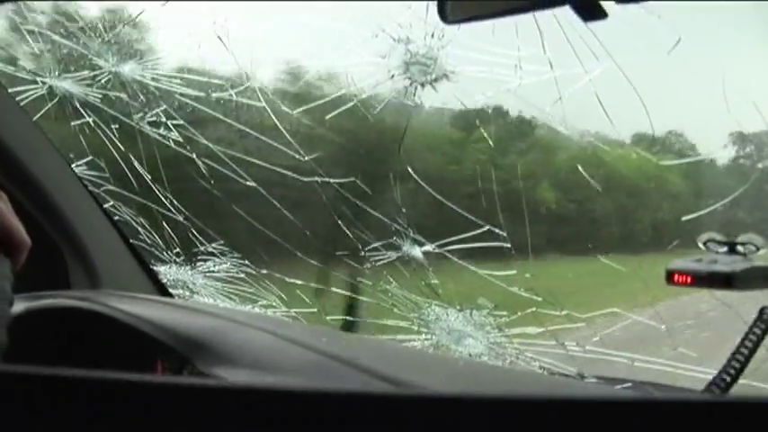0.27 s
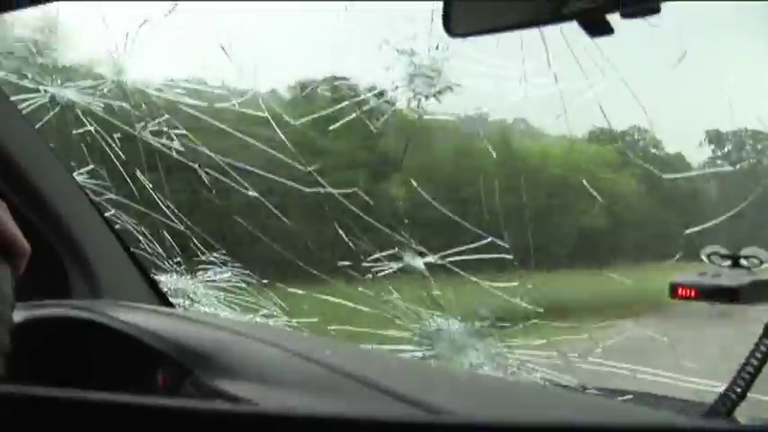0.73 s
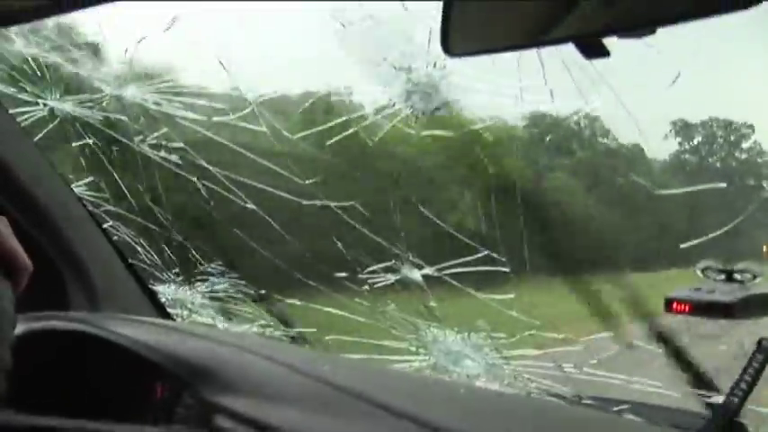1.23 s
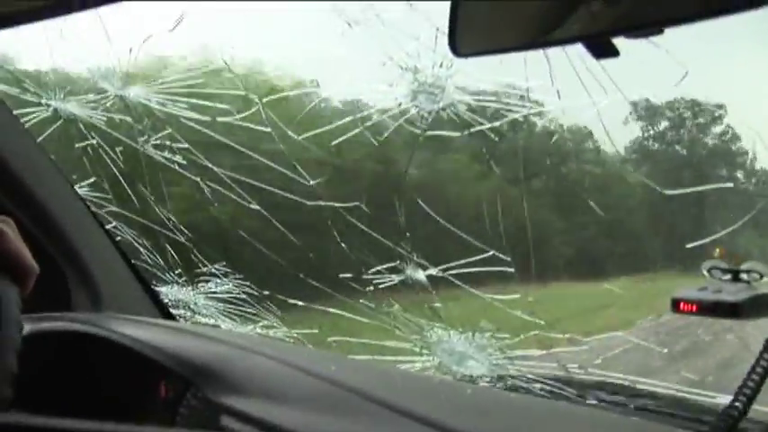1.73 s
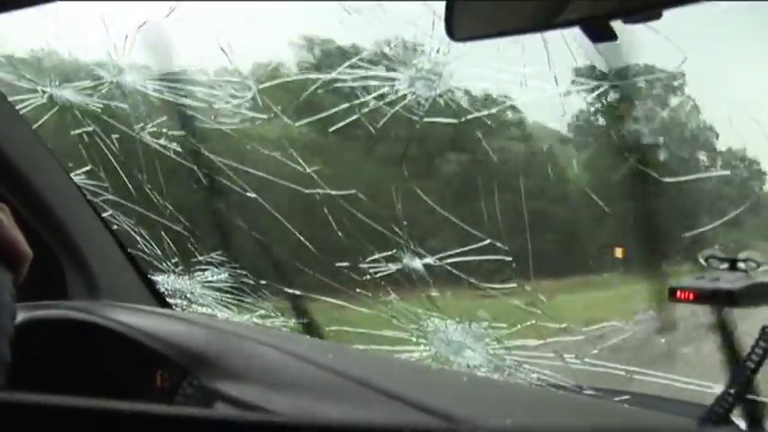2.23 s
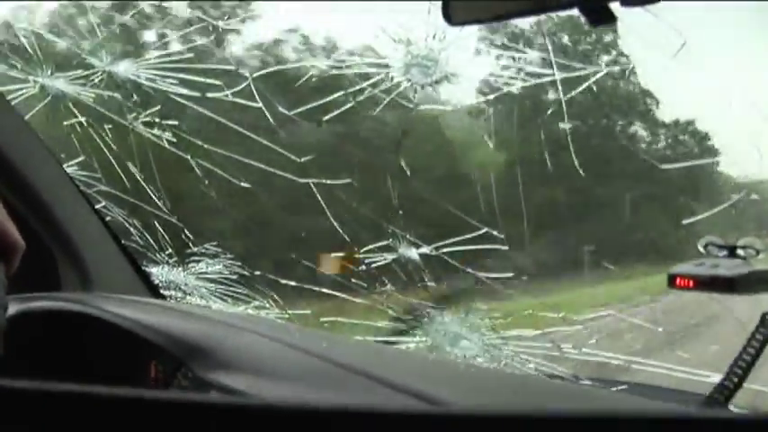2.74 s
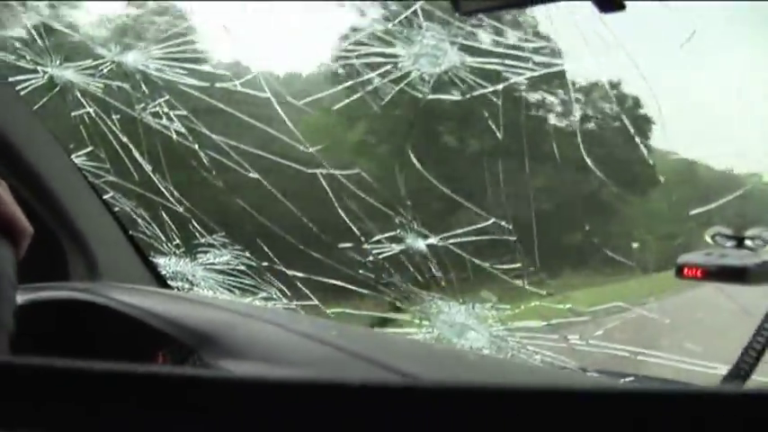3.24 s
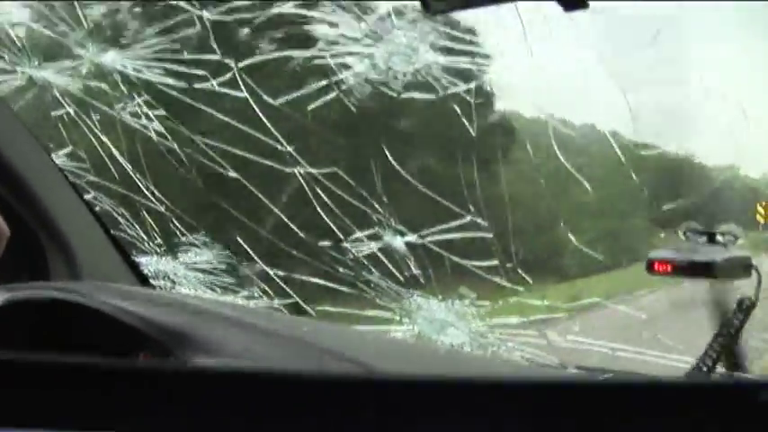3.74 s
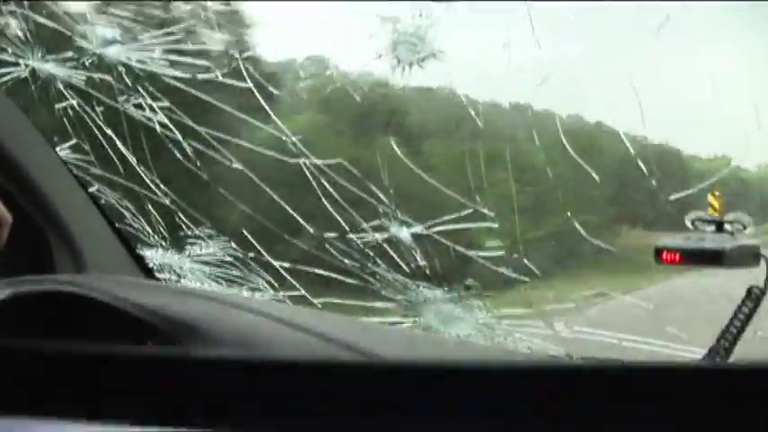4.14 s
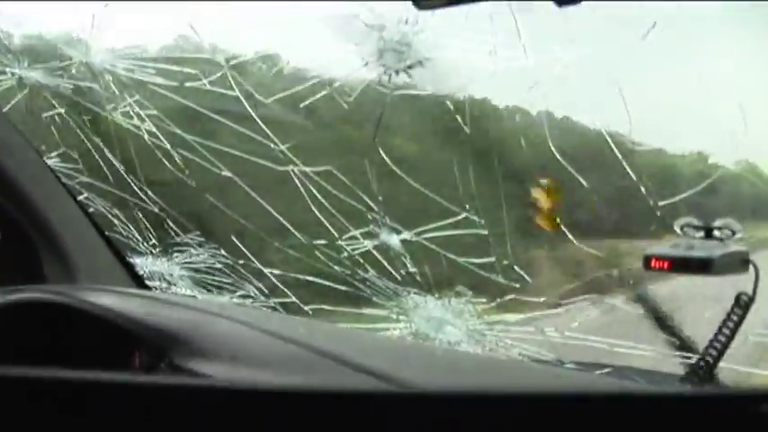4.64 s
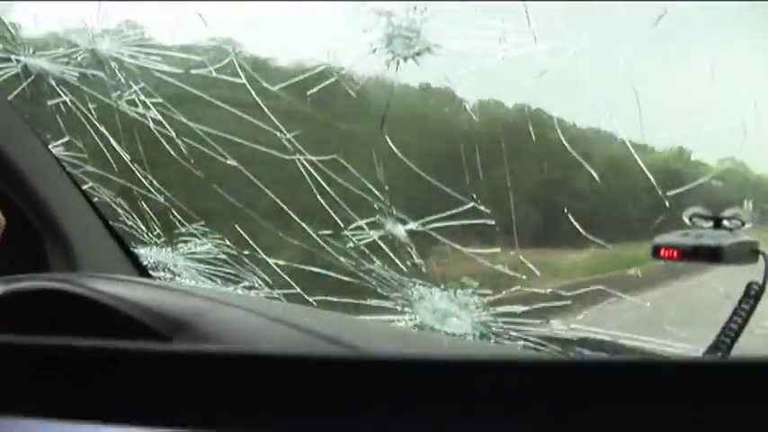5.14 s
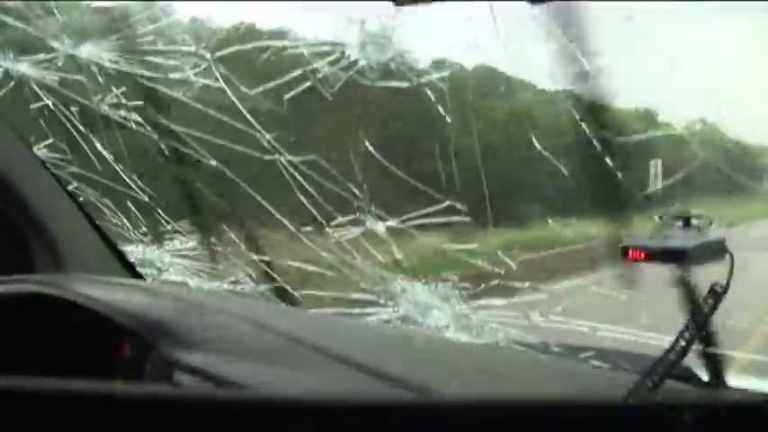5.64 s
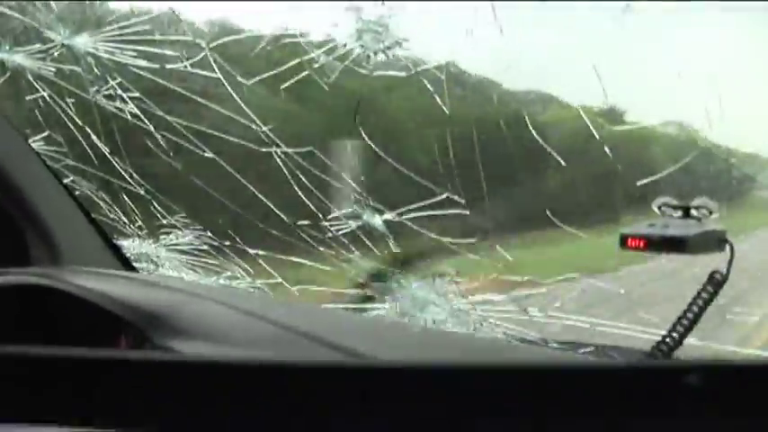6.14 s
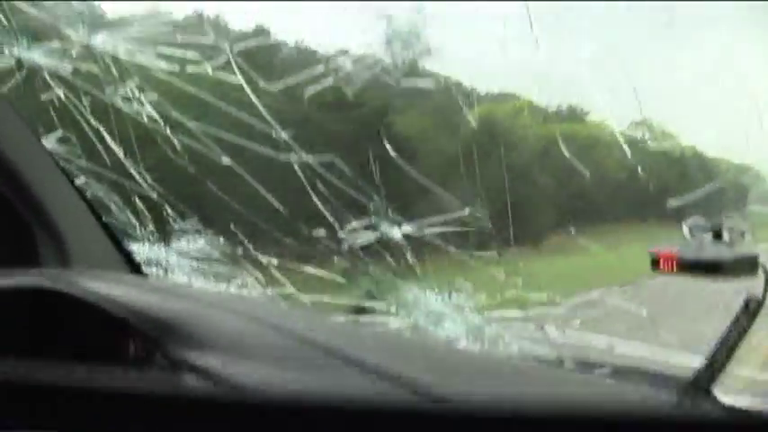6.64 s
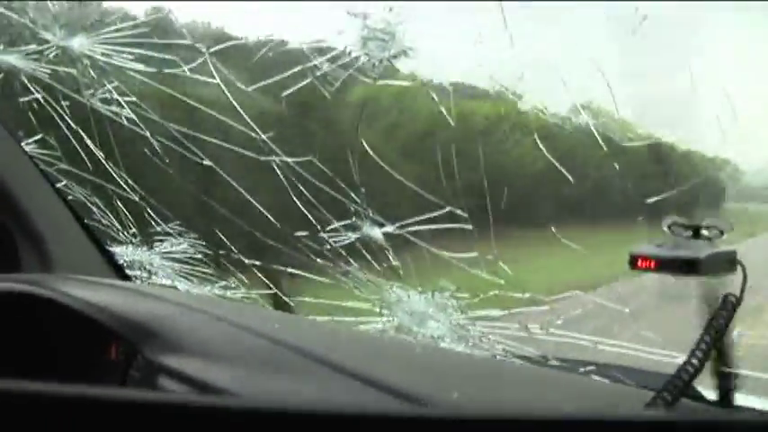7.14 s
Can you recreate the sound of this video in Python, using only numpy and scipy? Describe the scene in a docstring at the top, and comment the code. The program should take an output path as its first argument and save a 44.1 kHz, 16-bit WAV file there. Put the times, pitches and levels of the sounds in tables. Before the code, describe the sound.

Inside a car driving through a hailstorm, a steady low rumble of wind and tyres wavers slightly beneath a thin hiss of spray, with barely audible wiper swishes. A bassy bang on metal opens at 0 s, then a lighter one at 0.6 and a sharp windshield crack with a deep thud at 0.8. Loud hollow booms on the bodywork follow at 1.4, 1.8 and 2.1, and a glass crack at 2.3. From 2.8 to 4.4 it is sparser: small knocks, ticks and a few dull thuds. A hard crack on glass lands at 4.5, then heavy metal booms at 4.75, 5.05 and 5.2. Lighter taps lead to a bang at 6.4, and a dense volley of cracks and booms from 6.7 to 7.3, ending abruptly while still ringing. The ringing dies within about half a second; the biggest blows overload the microphone.

```python
"""Driving through a hailstorm

We sit inside a car: shaped noise makes the rumble of wind and tyres, the hiss of spray and the wipers.
Big stones boom on the roof and bonnet or crack on the broken windshield, loud enough to overload the microphone.
Smaller ones knock and tick in between. Each stone sets off many crowded resonances that die away,
the high ones mostly first; low sine waves make dull thuds in the bodywork."""
import sys
import numpy as np
from scipy import signal
from scipy.fft import irfft, next_fast_len
from scipy.io import wavfile

SR = 44100
rng = np.random.default_rng(int(sys.argv[2]) if len(sys.argv) > 2 else 0)


def put_to_file(sound):
    """Save the sound as 16-bit audio at rate SR, in the file named by the first command-line argument."""
    columns = np.atleast_2d(sound).T  # one column per channel
    safe = np.clip(columns, -1, 1)
    whole_steps = np.round(safe * 32767)
    wavfile.write(sys.argv[1], SR, whole_steps.astype(np.int16))


N = 325792  # length in samples

# colour of wind and tyre rumble, and of spray: f/Hz, relative level per Hz/dB
ROAD_COLOUR = [(12, -43), (20, -8), (86, -3), (138, -7), (168, -16), (243, -9.5), (274, -18), (309, -20),
               (343, -30.5), (398, -23), (428, -33.5), (490, -29), (700, -40), (910, -50), (1540, -120)]
SPRAY_COLOUR = [(410, -1), (700, -2.5), (968, 0.5), (1360, -5.5), (1800, -7.5), (2110, -7.5), (4950, -16.5),
                (7120, -39), (11800, -24), (14300, -33), (15500, -41)]
# wind on the body, added to ROAD_DB: t/s, level change/dB
WIND_BUFFETS = [(0, 5.5), (.4, 2), (2.2, -.7), (4.2, 0.7), (6.0, 0), (7.39, 3)]
ROAD_DB = -19.5
# water on the road and the glass: t/s, level/dB
SPRAY_LEVEL = [(0, -36), (1.2, -33.5), (2.6, -36.5), (4.1, -36), (5.5, -36), (6.0, -34.5), (7.39, -34.5)]
# wipers pushing water across the glass: t/s at the height of the stroke, length/s, level/dB
WIPER_STROKES = [(.503, 0.13, -45.5), (4.34, .14, -42), (5, 0.072, -41), (6.2, 0.64, -47)]
# colour of the pushed water: f/Hz, relative level per Hz/dB
WIPER_COLOUR = [(800, -22), (2000, 2), (3500, 2), (5300, 4.5), (7500, -15), (11500, -6), (15000, -16)]

# how sound inside the cabin differs between the two microphone ports:
# f/Hz, likeness (0 to 1)
PORT_LIKENESS = [(50, .99), (150, .97), (300, .88), (550, .35), (1000, .55), (2000, .8), (4000, .6),
                 (12000, .6)]
# f/Hz, phase by which left leads/rad
LEFT_LEAD = [(60, 0.0), (150, .35), (300, .9), (560, 1.6), (760, -1.0), (1050, -1.1), (2000, -.3),
             (3300, .1), (5000, 1.0), (6500, 2.2), (13000, 1.6)]
# f/Hz, left minus right level/dB
LEFT_MINUS_RIGHT = [(40, -4.5), (100, -2.5), (220, -.5), (400, 4.5), (680, 9.0), (1250, 2.5), (2300, 0.0),
                    (4400, 1.0), (12000, 0.0)]

# dull thuds in the bodywork: t/s, level/dB, f/Hz
BODY_THUDS = [(0.845, -3, 123.8), (2.959, -14.5, 241.6), (3.754, -16, 216.4), (5.101, -7, 100),
              (5.671, -21, 200.4), (6.931, -2.5, 112.3), (7.163, -13, 259)]
# small stones: t/s, relative level/dB, extra low body/dB
SMALL_HITS = [(0.057, -25, -25), (0.3588, -23.5, -4), (.378, -11, -8), (0.4847, -23, -1), (1.078, -19.5, 2),
              (1.724, -8, 22), (2.4834, -18, 5), (2.7055, -21.5, -26), (2.7671, -14.5, 0), (3.2304, -24, 0),
              (3.7417, -21.5, 15), (3.9724, -15, 2), (4.0696, -20.5, -7), (4.639, -15, 9), (4.8521, -8, 6),
              (5.4014, -21, -5), (5.6406, -17, 5), (5.83, -21.5, 2), (6.0523, -23.5, -37), (6.535, -22, 3),
              (6.785, -18.5, -5), (7.14, -15, 1)]
# big stones on the windshield: t/s, force/dB, extra bass/dB, the struck spot's own note f/Hz
GLASS_HITS = [(.833, 7, -0.5, 1080), (2.297, 3, -12, 900), (4.462, 6.5, -7.5, 274),
              (6.677, 3.5, -4.5, 1310), (7.062, 0.5, -13, 990)]
# big stones on sheet metal: t/s, force/dB, extra bass/dB, ring length factor,
# rise of the lowest sounds/s, the struck spot's own note f/Hz
METAL_HITS = [(0.0, -2, 11, 0.53, 0.0062, 990), (.632, -3, 4, 1.3, 0.0052, 1570),
              (1.406, 8, -2, 0.8, .017, 670), (1.779, 10, -1, 0.74, 0.02, 480),
              (2.119, 8.5, -0.5, 0.97, 0.0082, 240), (2.822, -6, -1, 0.66, 0.031, 960),
              (4.751, 5, 6, 0.48, 0.0032, 587), (5.057, 8, -6, 0.74, 0.0083, 790),
              (5.223, 11.5, -2.5, 0.79, 0.03, 890), (6.422, -0.5, 0, 0.78, 0.0091, 1720),
              (6.821, 5.5, -3.5, 0.91, 0.0076, 610), (6.906, 9.5, 3, 0.86, 0.0011, 950),
              (7.158, -6, -4, 0.58, 0.017, 1200), (7.269, 8.5, -16, 0.59, 0.022, 700)]

# colours of small stones, metal, glass, and a stone bursting into chips: f/Hz, relative level per Hz/dB
SMALL_COLOUR = [(80, -18), (300, 11), (600, -1), (1100, 7.5), (2000, 3.5), (3600, -2.5), (5500, -12),
                (8000, -30), (12000, -17), (16000, -34)]
METAL_COLOUR = [(50, -37), (120, -7.5), (250, -7), (450, -1.5), (800, -8), (1200, -8), (2000, -8),
                (3200, -12), (5000, -24.5), (8000, -33), (12000, -34.5), (16000, -44)]
GLASS_COLOUR = [(50, -10), (130, 4.5), (260, 1), (500, -2), (1000, -3), (2000, -1), (3500, 2), (5000, -11),
                (8000, -8.5), (12000, -15), (16000, -82)]
SHATTER_COLOUR = [(1500, -29), (4000, 3), (6000, 8), (8500, -24), (12000, 2.5), (16000, 1)]
# resonances of the body panels and of the windshield: f/Hz, width/Hz, boost or cut/dB
PANEL_RESONANCES = [(271.5, 58, 6), (365, 8.3, 2.5), (581, 10.7, 10.5), (770, 18, -8.5), (783, 33, 9),
                    (987, 320, 5.5), (1302, 14, 13.5)]
GLASS_RESONANCES = [(1300, 90, 3), (2400, 350, 2), (3200, 500, 3), (3900, 450, 5), (4800, 400, 3)]
# times to fade by 60 dB, before any length factor: f/Hz, fade time/s
SMALL_RING_TIMES = [(150, 0.66), (1000, 0.27), (2800, 0.16), (10000, 0.1)]
METAL_RING_TIMES = [(150, 0.65), (400, 0.5), (1000, 0.4), (2800, 0.24), (7000, 0.23), (14000, 0.26)]
GLASS_RING_TIMES = [(150, 0.18), (400, 0.24), (1000, 0.13), (2800, 0.088), (7000, 0.07), (14000, 0.037)]

# a big stone that lands abruptly is brighter than one that crushes slowly
PLAIN_RISE_S, TREBLE_DB_PER_HALVING = 0.0028, 1.5
CRACK_RISE_S = 0.0043
# the more body a knock has, the longer it rings: length factor, and dB of body that double it
KNOCK_LENGTH, BODY_DB_PER_DOUBLING = 0.73, 30
# a spot with more bass also has a slightly stronger note
NOTE_DB_PER_BASS_DB = 0.04


def amp(db):
    """Turn decibels into a plain multiplier."""
    return 10 ** (np.asarray(db) / 20)


def evened(x):
    """Scale a sound to an average (RMS) strength of 1."""
    return x / np.sqrt(np.mean(x ** 2) + 1e-20)


def read(points, hz):
    """Read a table by frequency, joined by straight lines on a log-frequency axis."""
    f, value = np.transpose(points)
    return np.interp(np.log(hz + 1), np.log(f), value)


def follow(points):
    """Read a table by time, at every sample."""
    return np.interp(np.arange(N) / SR, *np.transpose(points))


def add(mix, s, sound):
    """Lay a sound into the mix at s seconds, cutting off what runs past the end."""
    part = mix[:, max(round(s * SR), 0):][:, :sound.shape[1]]
    part += sound[:, :part.shape[1]]


def drift(per_s):
    """Slow random wandering: straight lines between per_s random values a second."""
    knots = rng.standard_normal(4096)
    return np.interp(np.arange(N) / SR * per_s, np.arange(len(knots)), knots)


def lumps(hz, width_hz):
    """Chance in how strongly each group of resonances is struck."""
    knots = rng.standard_normal(1024)
    return np.interp(hz / width_hz, np.arange(len(knots)), knots)


def bump(hz, centre, width):
    """The shape of one resonance, 1 at its top."""
    return 1 / (1 + (2 * (hz - centre) / width) ** 2)


def low_shelf(hz, corner_hz):
    """A share that is 1 in the lows and falls to 0 above the corner."""
    return 1 / (1 + (hz / corner_hz) ** 4)


def high_shelf(hz, corner_hz):
    """A share that is 0 in the lows and rises to 1 above the corner."""
    return hz ** 4 / (hz ** 4 + corner_hz ** 4)


def cabin_field(hz):
    """Random spectra of sound that reaches the two microphone ports by many paths."""
    shared, separate = np.exp(2j * np.pi * rng.random((2, len(hz))))  # random phases
    same = np.clip(read(PORT_LIKENESS, hz), 0, 1)
    side_db = read(LEFT_MINUS_RIGHT, hz)
    right = same * shared + np.sqrt(1 - same ** 2) * separate
    right = right * np.exp(-1j * read(LEFT_LEAD, hz))
    return np.array([shared * amp(side_db / 2), right * amp(-side_db / 2)])


def steady(spectrum):
    """Noise of a given colour filling the cabin."""
    size = next_fast_len(N, real=True)
    hz = np.fft.rfftfreq(size, 1 / SR)
    noise = irfft(cabin_field(hz) * amp(read(spectrum, hz)), size)
    return evened(noise[:, :N])


def strike(colour_db, ring, length, rise, lumpy_db=2.0, direct_hz=3500, size=32768):
    """A pane or panel rings with crowded resonances, each band dying in its own time."""
    hz, t = np.fft.rfftfreq(size, 1 / SR), np.arange(size) / SR
    modes = cabin_field(hz) * amp(colour_db(hz) + lumpy_db * lumps(hz, width_hz=65))
    modes /= irfft(modes).std()
    centres = np.transpose(ring)[0]
    out = np.zeros((2, size))
    for share, (centre, t60) in zip(np.eye(len(ring)), ring):
        band = read(np.c_[centres, share], hz)  # neighbouring bands overlap and add up to 1
        band_rise = max(rise, 1e-4) / (1 + (centre / direct_hz) ** 2)  # short bending waves travel fastest
        fade = np.exp(-np.log(1000) * t / max(t60 * length, .01))
        out += irfft(modes * band) * fade * np.minimum(t / band_rise, 1)
    return out


def road(lump_db=1.5):
    """Tyre rumble and wind buffeting the body: low noise of wandering loudness."""
    return steady(ROAD_COLOUR) * amp(ROAD_DB + follow(WIND_BUFFETS) + lump_db * drift(per_s=14))


def spray():
    """Rain and road water hiss against the car: noise that follows the wetness."""
    return steady(SPRAY_COLOUR) * amp(follow(SPRAY_LEVEL))


def wipers():
    """Each stroke swells and fades as the blades speed up and slow down."""
    t = np.arange(N) / SR
    strokes = sum(amp(db) * np.exp(-(2 * (t - s) / length) ** 2) for s, length, db in WIPER_STROKES)
    return steady(WIPER_COLOUR) * strokes


def patter(per_s=30, level_db=-43, spread_db=4, count=12):
    """Drops and ice chips tick at random on the glass, in a dozen different sounds."""
    out = np.zeros((2, N))
    for _ in range(count):
        happens = rng.random(N) < per_s / count / SR
        clicks = happens * amp(spread_db * np.minimum(rng.exponential(1, N), 3))
        tick = strike(lambda hz: read(SMALL_COLOUR, hz), GLASS_RING_TIMES, length=0.29, rise=0.0033, size=8192)
        out += signal.oaconvolve(clicks[None], tick, axes=1)[:, :N]
    return amp(level_db) * evened(out)


def pellets(quietest_db=-30, range_db=4, count=20):
    """The smallest stones tap faintly all the while, at uneven intervals."""
    out = np.zeros((2, N))
    for k, (when, size) in enumerate(rng.random((count, 2))):
        tap = strike(lambda hz: read(SMALL_COLOUR, hz), SMALL_RING_TIMES, length=0.52, rise=0.0011,
                     lumpy_db=11, size=8192)
        s = (k + when) / count * N / SR  # one tap somewhere in each equal slot
        add(out, s, amp(quietest_db + range_db * size) * tap)
    return out


def thuds(t60=0.4, rise=0.011):
    """One low resonance of the bodywork swells and dies: a sine, alike on both sides."""
    out, t = np.zeros((2, N)), np.arange(SR // 2) / SR
    for s, db, hz in BODY_THUDS:
        envelope = np.minimum(t / rise, 1) * np.exp(-np.log(1000) * t / t60)
        boom = np.sin(2 * np.pi * hz * t) * envelope
        add(out, s, amp(db) * np.array([boom, boom]))
    return out


def small_stones(level_db=-3, body_hz=1500):
    """Light knocks, some dull and long, some bright and short."""
    out = np.zeros((2, N))
    for s, hit_db, body_db in SMALL_HITS:
        def colour_db(hz):
            return read(SMALL_COLOUR, hz) + body_db * low_shelf(hz, body_hz)

        length = KNOCK_LENGTH * 2 ** (body_db / BODY_DB_PER_DOUBLING)
        knock = strike(colour_db, SMALL_RING_TIMES, length, rise=0.0057, lumpy_db=4.0, size=16384)
        add(out, s - .002, amp(hit_db + level_db) * knock)  # starts 2 ms ahead of the listed time
    return out


def shatter(level_db=-9, t60=0.067):
    """Ice bursts against the windshield in a short bright spit."""
    out = np.zeros((2, N))
    for s, force_db, *_ in GLASS_HITS:
        spit = strike(lambda hz: read(SHATTER_COLOUR, hz), [(8000, t60)], length=1.0, rise=0.0017, size=8192)
        add(out, s, amp(force_db + level_db) * spit)
    return out


def big_stones(rows, spectrum, ring, resonances, note_t60, plain_note_db, bright_db, pan_db,
               bass_hz=380, treble_hz=1800, note_width=0.26, sustain_db=-19):
    """Where a stone lands and how hard it is set the shares of boom and crack."""
    out = np.zeros((2, N))
    sides = amp(np.array([[pan_db], [-pan_db]]) / 2)  # left slightly louder
    for s, force_db, bass_db, length, rise, note_hz in rows:
        treble_db = bright_db + TREBLE_DB_PER_HALVING * np.log2(PLAIN_RISE_S / max(rise, 1e-4))
        note_db = plain_note_db + NOTE_DB_PER_BASS_DB * bass_db
        note_width_hz = note_width * note_hz
        all_resonances = [*resonances, (note_hz, note_width_hz, note_db)]

        def colour_db(hz):
            peaks = sum(db * bump(hz, f, width) for f, width, db in all_resonances)
            tilt = bass_db * low_shelf(hz, bass_hz) + treble_db * high_shelf(hz, treble_hz)
            return read(spectrum, hz) + peaks + tilt

        def note_only_db(hz):
            return 20 * np.log10(bump(hz, note_hz, note_width_hz) ** 2)

        blow = strike(colour_db, ring, length, rise)
        # the struck spot's own note adds a hollow ring
        hollow = amp(sustain_db + note_db) * strike(note_only_db, [(note_hz, note_t60)], length, 2 * rise)
        add(out, s, amp(force_db) * sides * (blow + hollow))
    return out


def metal_booms():
    """Big stones set the thin roof and bonnet booming."""
    return big_stones(METAL_HITS, METAL_COLOUR, METAL_RING_TIMES, PANEL_RESONANCES,
                      note_t60=0.45, plain_note_db=4, bright_db=-2.1, pan_db=0.5)


def glass_cracks():
    """Big stones crack on the windshield, which rings more briefly than the metal."""
    rows = [(s, force_db, bass_db, 1, CRACK_RISE_S, note_hz) for s, force_db, bass_db, note_hz in GLASS_HITS]
    return big_stones(rows, GLASS_COLOUR, GLASS_RING_TIMES, GLASS_RESONANCES,
                      note_t60=0.23, plain_note_db=2.5, bright_db=-4.4, pan_db=0.2)


def scene():
    """Hail on metal and glass over the noise of driving."""
    driving = road() + spray() + wipers()
    light_hail = patter() + pellets() + thuds() + small_stones()
    heavy_hail = shatter() + glass_cracks() + metal_booms()
    return driving + light_hail + heavy_hail


def record(dry):
    """The microphone input flattens peaks that are too loud, then the highest treble is cut."""
    ceiling, edge_hz = .95, 16200
    fine = signal.resample_poly(dry, 2, 1, axis=1)  # clip at twice the sample rate
    clipped = signal.resample_poly(np.clip(fine, -ceiling, ceiling), 1, 2, axis=1)
    low_pass = signal.firwin(511, edge_hz, window=("kaiser", 9), fs=SR)
    return signal.oaconvolve(clipped, low_pass[None], "same", axes=1)


dry = scene()
out = record(dry)
put_to_file(out)
```